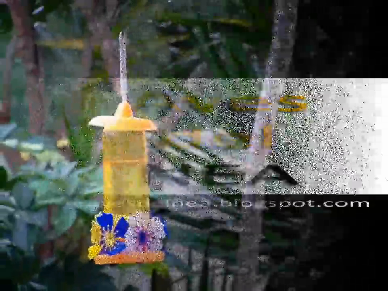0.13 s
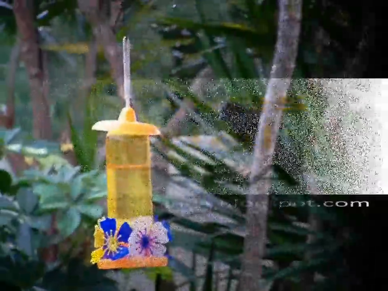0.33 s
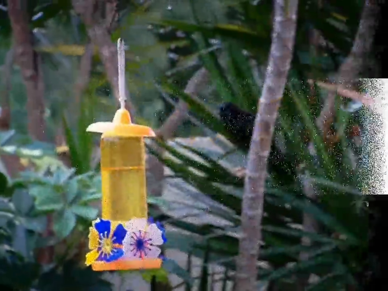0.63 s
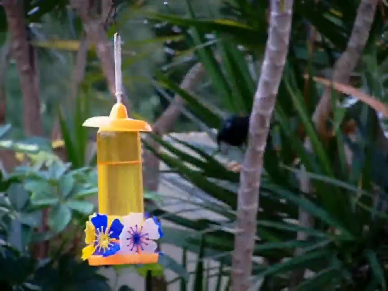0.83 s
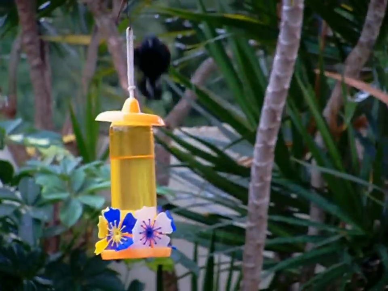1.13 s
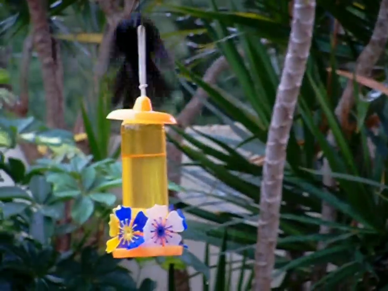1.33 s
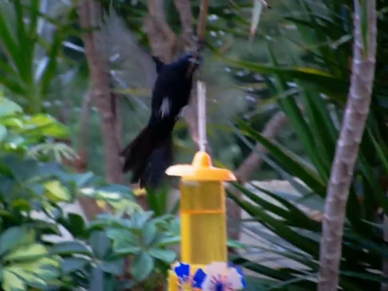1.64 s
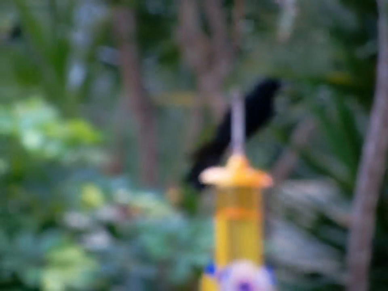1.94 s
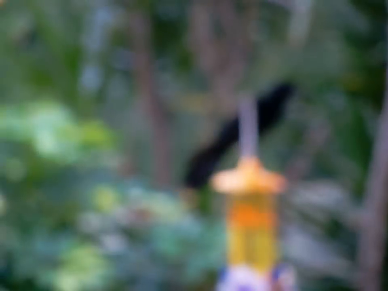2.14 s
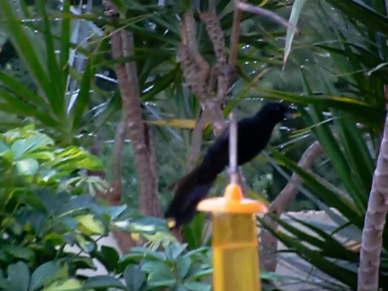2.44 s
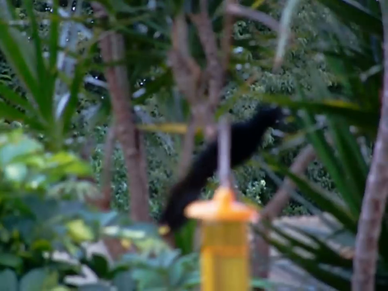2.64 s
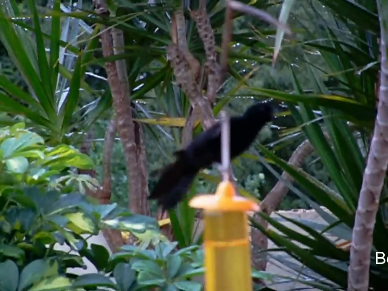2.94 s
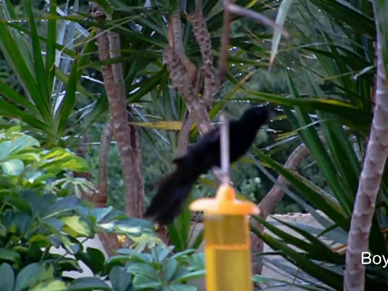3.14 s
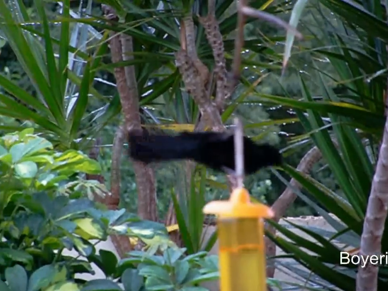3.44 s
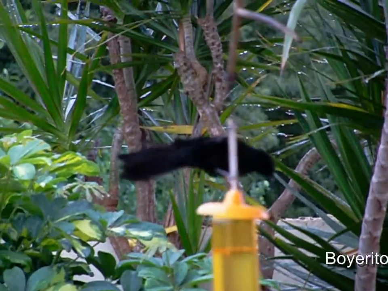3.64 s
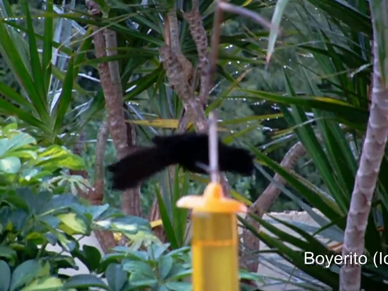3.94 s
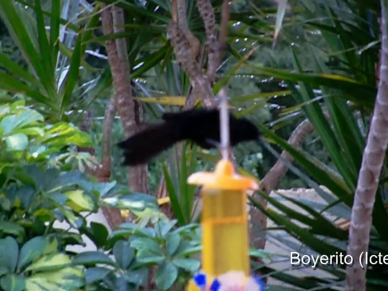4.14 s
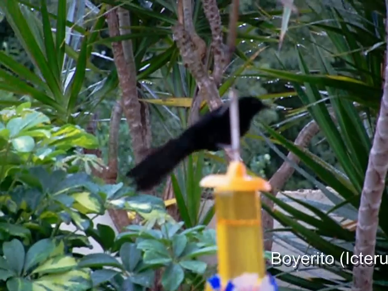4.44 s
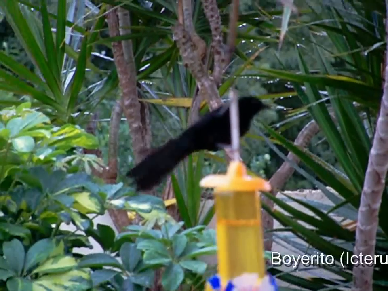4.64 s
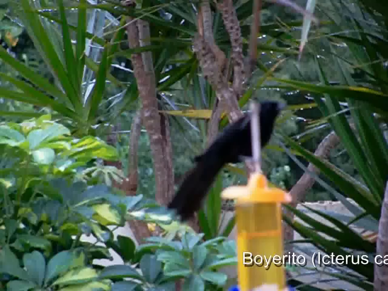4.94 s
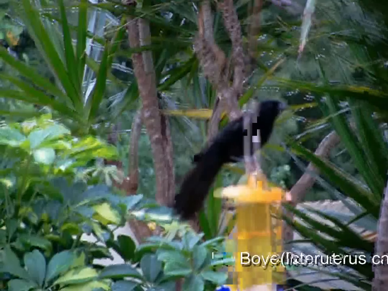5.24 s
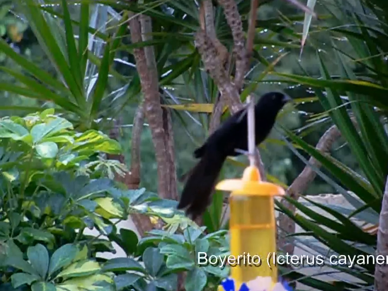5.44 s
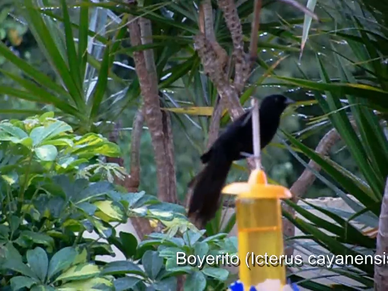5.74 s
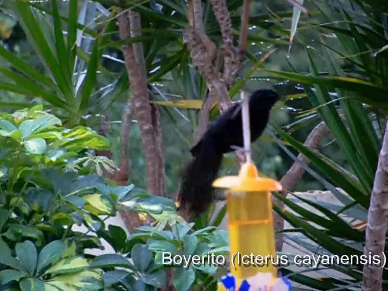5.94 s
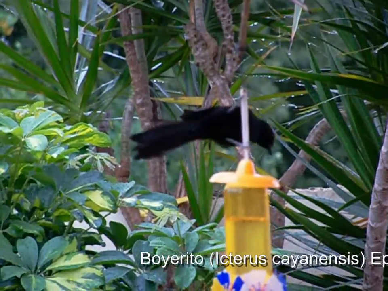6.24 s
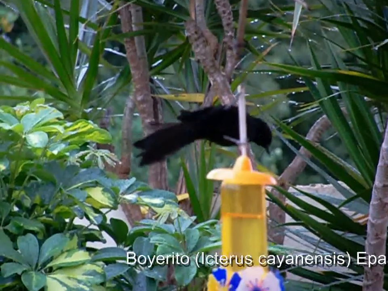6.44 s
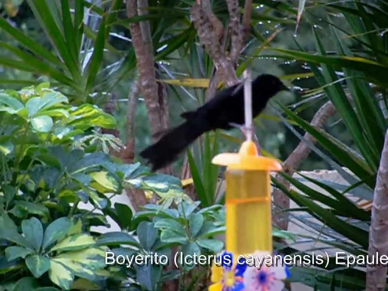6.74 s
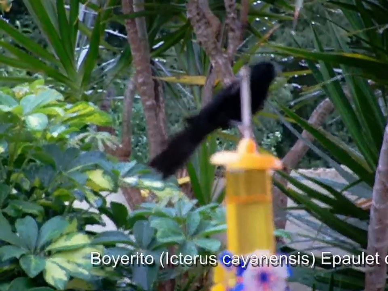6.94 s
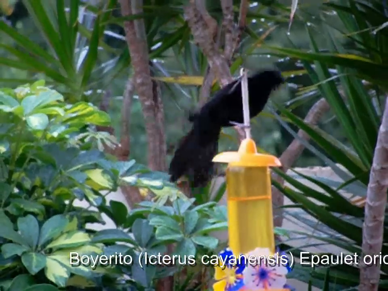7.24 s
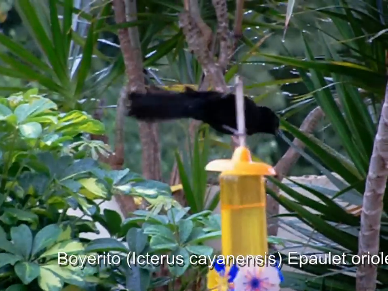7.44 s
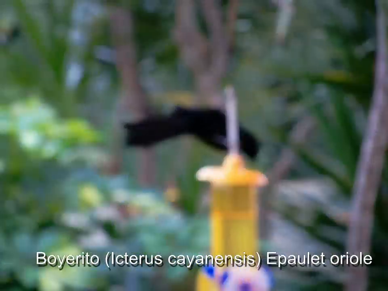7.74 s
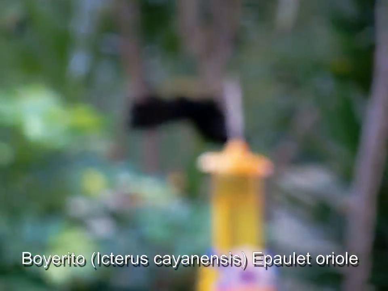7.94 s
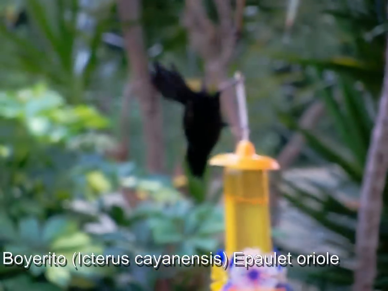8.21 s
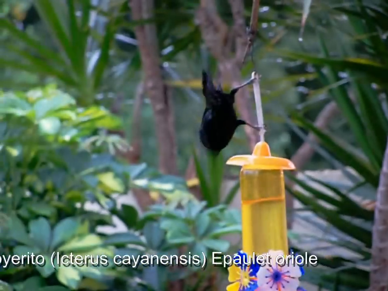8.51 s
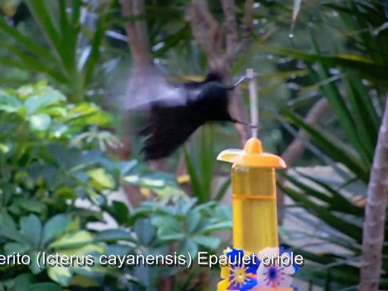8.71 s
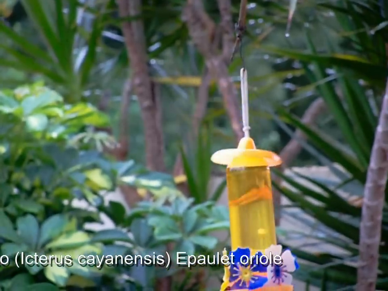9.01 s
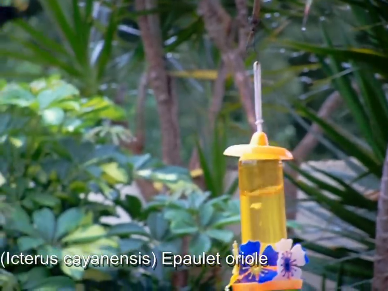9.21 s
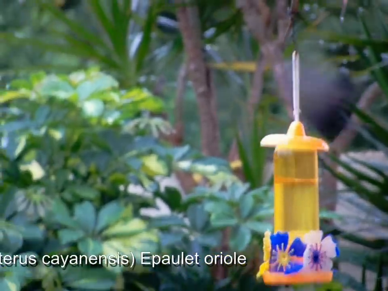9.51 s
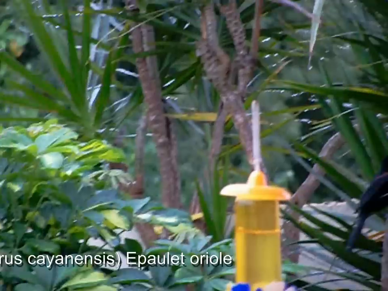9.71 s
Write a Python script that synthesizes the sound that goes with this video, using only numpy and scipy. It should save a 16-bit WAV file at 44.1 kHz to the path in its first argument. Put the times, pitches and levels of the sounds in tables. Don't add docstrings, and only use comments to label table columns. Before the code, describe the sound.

Irregular short bird calls, some clipped and piercing, some nasal or raspy, with claw scratches and tiny ticks over a low garden hum.

```python
import sys
import numpy as np
from scipy import signal
from scipy.fft import rfft, irfft
from scipy.io import wavfile
from scipy.ndimage import uniform_filter1d

SR = 44100
rng = np.random.default_rng(int(sys.argv[2]) if len(sys.argv) > 2 else 0)


def output_pcm(signal):
    pcm = np.clip(np.atleast_2d(signal).T, -1, 1) * 32767
    wavfile.write(sys.argv[1], SR, np.round(pcm).astype(np.int16))


def invert_db(x):
    u = np.asarray(x, float) / 20
    return 10 ** u


N = 435266
SAMPLING_HZ = 16000

# frequency in Hz, level in dB per Hz.
AIR_SPECTRUM = [(8.8, -55), (15, -1.5), (66, 0), (229, -10.5), (349, -13.5), (455, -15.5), (533, -16),
                (905, -18), (980, -17.5), (1660, -26.5), (1900, -28.5), (2170, -32.5), (5330, -41.5),
                (7510, -45.5), (8350, -43), (10900, -79), (18400, -120)]
# time in seconds, level in dB.
TRAFFIC_SWELL = [(0.0, -61), (0.3, -61), (0.77, -57.5), (1.67, -57.5), (4.48, -62), (5.61, -61.5),
                 (7.34, -63.5), (8.69, -64.5), (9.04, -60.5), (9.87, -62)]
# level at mean swell in dB, share of the swing it follows (0-1).
GARDEN_LAYERS = [
    (-54, 0.51),
    (-61, 0.98),
    (-63, 0.97),
]
# frequency in Hz, width in Hz, level in dB.
MOTOR_HUM = [
    (100, 10, -64),
    (963, 1.5, -75),
    (1926, 1.5, -81),
]
# frequency in Hz, time to die by 60 dB in seconds.
WALL_DECAY = [(1000, 0.22), (3000, 0.3734), (5500, 0.39), (8000, 0.34)]
# delay in seconds, spread in seconds, level over the tail in dB.
WALL_SLAPS = [
    (0.01, 0.0054, 6),
    (0.026, 0.0026, 2.5),
]
# time in seconds, peak in dB.
TICKS = [(0.4641, -33.5), (0.4904, -35), (0.5207, -36.5), (0.5703, -35.5), (0.619, -35.5), (0.678, -37),
         (0.7198, -33.5), (0.7905, -35), (0.832, -35), (1.2511, -41), (1.28, -41), (1.3111, -40.5),
         (1.697, -41), (1.726, -40.5)]
# frequency in Hz, width in Hz, level in dB.
TICK_BANDS = [(7600, 600, -7), (6300, 700, -11), (5100, 500, -15)]
# time in seconds, peak in dB.
TWITTER = [(3.113, -51), (3.170, -45), (3.222, -47), (3.268, -52), (3.284, -37), (3.322, -58)]
# time in seconds, peak in dB, frequency in Hz.
SCRATCHES = [(1.233, -40, 5460), (1.556, -38, 5140), (1.874, -31, 3510), (1.881, -29, 3510),
             (1.889, -35, 3620), (1.918, -39.5, 5580), (2.546, -41.5, 4770), (4.433, -40.5, 3430),
             (4.633, -41, 4170), (5.679, -43, 2200), (8.743, -36.5, 3440), (8.751, -39, 3280),
             (8.767, -40, 2520), (8.774, -32, 3060), (8.801, -30.5, 3890), (8.807, -22, 3530),
             (8.822, -46, 3830), (8.879, -31.5, 4730), (8.885, -25, 3190), (8.896, -30, 3560),
             (8.899, -30.5, 1800), (9.068, -42, 3240), (9.075, -34, 3360), (4.507, -45, 5400),
             (4.541, -45, 5900), (4.662, -46, 5820), (4.722, -49, 5000)]
# time in seconds, peak in dB, frequency in Hz.
TAPS = [(5.917, -46, 1900), (7.252, -56.5, 5410), (7.915, -52.5, 2110), (8.842, -48, 6350),
        (8.843, -48, 1213), (8.8, -41, 1050)]
# start in seconds, length in seconds, first pitch in Hz, last pitch in Hz, level in dB.
FAR_WHISTLES = [
    (2.6, .1, 3180, 3400, -72),
    (2.68, .12, 3420, 3230, -70),
    (3.875, .045, 2920, 2850, -68),
    (.714, .026, 4900, 4450, -47),
]
# frequency in Hz, gain in dB.
THROAT = [(900, -45), (1300, -1.5), (2000, -15), (3000, 10), (4000, -4), (5000, -4), (6000, -14),
          (7300, -6.5), (8200, -13)]
# start in seconds, length in seconds, top pitch in Hz, time of the upward snap in seconds.
ARCHES = [
    (2.845, .177, 2030, .021),
    (6.086, .177, 2085, .016),
    (6.885, .154, 2095, .018),
    (7.364, .159, 2030, .021),
]
# level in dB, swell to the end in dB, added brightness in dB per partial.
ARCH_EFFORTS = [(-36.5, 2, 0.7), (-42, 8.5, -0.14), (-37.5, 5, -0.5), (-40.5, 3, -0.2)]
# start in seconds, first voice in Hz, second voice in Hz.
CHIPS = [
    (.082, 5830, 4900),
    (2.08, 5410, 4570),
    (9.425, 5570, 4690),
]
# first voice in dB, second voice in dB, rough onset in dB.
CHIP_LEVELS = [(-31, -48, -53), (-27, -32, -44.5), (-32, -39, -52.5)]
# time in seconds, pitch in Hz, level in dB, roughness (0-1).
CHURR = [
    (3.95, 1240, -40, 0.7),
    (3.955, 1198, -44.5, 0.7),
    (3.995, 1180, -42, 1),
    (4.04, 1025, -38, 1.05),
    (4.08, 905, -47, 0.8),
    (4.099, 839, -51, 0.8),
]
# time in seconds, pitch in Hz, level in dB, roughness (0-1).
CREAK = [
    (4.925, 1245, -46.5, 0.4),
    (4.938, 1284, -43, 0.8),
    (4.955, 1053, -47, 1.3),
    (4.982, 1225, -44, 0),
    (5.005, 1193, -42, 0.1),
    (5.022, 1310, -44, 0.04),
]
# time in seconds, pitch in Hz, level in dB, roughness (0-1).
WHISTLE = [
    (5.029, 3100, -28.5, 0.09),
    (5.031, 3084, -34.5, 0),
    (5.057, 2948, -37.5, 0.04),
    (5.069, 2673, -34.5, 0.06),
    (5.086, 2415, -37, 0.1),
    (5.093, 2024, -32.5, 0.6),
    (5.099, 1740, -28.5, .6),
]
# level in dB, first partial to last.
ARCH_PARTIALS = [1.5, 3, -3.3, -4.5, -5.5, -0.5]
CLUCK_PARTIALS = [-30, 11, 0.5, 10, -7]
CHURR_PARTIALS = [-36, 6, 3, -7, -4.5, -4, -7, -12.5]
CREAK_PARTIALS = [-1.5, 4, -10.5, -19, -9.5, -12]
WHISTLE_PARTIALS = [0, -27, -13]
ONSET_PARTIALS = [2, 2.5, 10.5, 10.5, 6.5]
# level in dB, first to last.
CHURR_HALVES = [-60, -60, -14, -54.5, -5, -60, 2.5, -60.5, -10, -61, -3.5]
# frequency in Hz, gain in dB.
INPUT_FILTER = [(7500, 0.08), (7800, -5.5), (7990, -8.5)]
# frequency in Hz, gain in dB.
SMOOTHING_FILTER = [(7300, -1.07), (7800, -0.5), (8200, -6), (8600, -21), (9000, -36.5), (9400, -46),
                    (10000, -39.5), (11000, -51), (12000, -56.5), (12600, -77), (13000, -87)]


def in_log(points, hz):
    table_hz, values = np.array(points)[:, 0], np.array(points)[:, 1]
    return np.interp(np.log(hz), np.log(table_hz), values)


def rms_one(x):
    return x / np.sqrt(np.mean(np.abs(x) ** 2) + 1e-20)


def flutter(size, width_hz):
    r = np.exp(-2 * np.pi * width_hz / SR)
    white = rng.standard_normal(size) + 1j * rng.standard_normal(size)
    return rms_one(signal.lfilter([1], [1, -2 * r, r * r], white))


def add(out, s, piece):
    i = round(s * SR)
    out[i:i + len(piece)] += piece[:N - i]


def shaped(x, points):
    hz = np.arange(N // 2 + 1) * SR / N + 1
    return irfft(rfft(x) * invert_db(in_log(points, hz)), N)


def highpass(x, hz):
    return signal.sosfilt(signal.butter(4, hz, "high", fs=SR, output="sos"), x)


def garden():
    s, swell_db = np.transpose(TRAFFIC_SWELL)
    t = np.arange(N) / SR
    hz = np.arange(N // 2 + 1) * SR / N + .01
    spectrum = rfft(rng.standard_normal(N)) * invert_db(in_log(AIR_SPECTRUM, np.minimum(hz, 7400)))
    low = 1 / (1 + (hz / 200) ** 4)
    high = 1 / (1 + (2500 / hz) ** 4)
    swing_db = np.interp(t, s, swell_db - swell_db.mean())
    out = 0
    for part, (level_db, follows) in zip((low, 1 - low - high, high), GARDEN_LAYERS):
        layer = rms_one(irfft(spectrum * part, N))
        out = out + layer * invert_db(level_db + follows * swing_db)
    for line_hz, width_hz, level_db in MOTOR_HUM:
        wobble = .8 + .6 * flutter(N, width_hz)
        out = out + invert_db(level_db + 3.5) * np.imag(wobble * np.exp(2j * np.pi * line_hz * t))
    return out


def walls(x):
    echo_db, rise_s = 1.5, 0.0035
    t = np.arange(int(.7 * SR)) / SR
    white = rng.standard_normal(len(t))
    edges = np.geomspace(600, 9600, 9)
    tail = 0
    for low, high in zip(edges, edges[1:]):
        band = signal.sosfilt(signal.butter(2, [low, high], "band", fs=SR, output="sos"), white)
        tail = tail + band * invert_db(-60 * t / in_log(WALL_DECAY, np.sqrt(low * high)))
    bunches = sum(invert_db(slap_db) * np.exp(-((t - s) / spread) ** 2) for s, spread, slap_db in WALL_SLAPS)
    tail = tail * (1 - np.exp(-t / rise_s)) * (1 + bunches)
    tail = invert_db(echo_db) * tail / np.sqrt(np.sum(tail ** 2) * 5 / 2)
    return x + signal.fftconvolve(x, tail)[:N]


def puff(out, s, level_db, hz, width_hz, length):
    t = np.arange(int(4 * length * SR) + 64) / SR
    band = np.imag(flutter(len(t), width_hz) * np.exp(2j * np.pi * hz * t))
    attack = np.clip(t / 0.00055, 0, 1)
    add(out, s, invert_db(level_db) * band * np.exp(-3 * t / length) * attack)


def scratches(out):
    scratch_s = 0.01
    for s, level_db, hz in TAPS:
        puff(out, s, level_db, hz, 0.17 * hz, .006)
    for s, level_db, hz in SCRATCHES:
        puff(out, s, level_db - 9, hz, .16 * hz, scratch_s)
        puff(out, s + .001, level_db - 19.5, 1.4 * hz, 0.18 * hz, scratch_s)
        puff(out, s, level_db - 30.5, 2 * hz, 0.091 * hz, scratch_s)


def sing(out, rows, partials_db, wobble_hz=257.0):
    s, hz, level_db, rough = np.transpose(rows)
    t = s[0] + np.arange(int((s[-1] - s[0]) * SR)) / SR
    pitch = np.interp(t, s, hz)
    pitch = uniform_filter1d(pitch, len(t) // 16 + 1, mode="nearest")
    phase = 2 * np.pi * np.cumsum(pitch) / SR
    rough = np.clip(np.interp(t, s, rough), 0, 1)
    edge = np.clip(np.minimum(t - s[0], s[-1] - t) / 0.0027, 0, 1)
    tone = 0
    for k, partial_db in enumerate(partials_db, 1):
        gain = invert_db(in_log(THROAT, k * pitch) + partial_db)
        cycles = np.sqrt(1 - rough) + np.sqrt(rough) * flutter(len(t), wobble_hz)
        tone = tone + gain * np.imag(cycles * np.exp(1j * k * phase))
    add(out, s[0], np.sqrt(2) * edge * invert_db(np.interp(t, s, level_db)) * tone)


def far_whistles(out):
    fade_db, clear_db, blurred_db = 11, -40, -90
    share = np.linspace(0, 1, 20)
    for s, length, first_hz, last_hz, level_db in FAR_WHISTLES:
        rough = (clear_db - level_db) / (clear_db - blurred_db) + 0 * share
        pitch = last_hz + (first_hz - last_hz) * (1 - share) ** 2
        fade = level_db - fade_db * (2 * share - 1) ** 4
        sing(out, np.c_[s + length * share, pitch, fade, rough], [0], wobble_hz=60.)


def small_birds(out):
    for s, level_db in TICKS:
        for hz, width_hz, band_db in TICK_BANDS:
            puff(out, s, level_db + band_db + 1.5, hz, width_hz, 0.011)
    first_hz, climb_hz_per_s = 7720, 900
    for s, level_db in TWITTER:
        puff(out, s, level_db, first_hz + climb_hz_per_s * (s - TWITTER[0][0]), 150., 0.013)


def neighbours():
    out = np.zeros(N)
    small_birds(out)
    scratches(out)
    far_whistles(out)
    return out


def broken_whistle(out):
    sing(out, CREAK, CREAK_PARTIALS)
    second_voice = [(4.927, 1520, -49, .4), (4.937, 1581, -36.5, 0.82), (4.955, 1666, -43, 0.62)]
    sing(out, second_voice, [0, -6])
    sing(out, WHISTLE, WHISTLE_PARTIALS)


def churr():
    out = np.zeros(N)
    sing(out, CHURR, CHURR_PARTIALS, wobble_hz=190.)
    sing(out, np.array(CHURR) * [1, .5, 1, 1], CHURR_HALVES, wobble_hz=150.)
    sing(out, np.array(CHURR) * [1, 1.7, 0.85, 1], [-4.5], wobble_hz=200.)
    beat_hz = 185 * (1 + 0.303 * flutter(N, 57.0).real)
    beat = 2 * np.pi * np.cumsum(beat_hz) / SR
    return highpass(out, 1250) * (1 + .5 * np.cos(beat))


def chip(out, s, first_hz, second_hz, first_db, second_db, onset_db):
    start_slack, snap_s, snap_power, length_s = .58, .0108, 8, .028
    top_db, slack_loss_db, hold_s, release_db_per_s = 2, 78, 0.022, 3995
    after = np.linspace(0, length_s, 20)
    slack = start_slack / (1 + (after / snap_s) ** snap_power)
    ratio = 1 - slack
    shape_db = top_db - slack_loss_db * slack - release_db_per_s * np.maximum(after - hold_s, 0)
    rough = .15 + 0 * after
    sing(out, np.c_[s + after, first_hz * ratio, first_db + 10.5 + shape_db, rough], [0])
    sing(out, np.c_[s + .003 + after, second_hz * ratio, second_db + 8 + shape_db, rough], [0])
    creak = [(s, 1350, onset_db - 1.0, .8), (s + 0.00702, 1550, onset_db, .8), (s + 0.01365, 1900, onset_db + 8, .8)]
    sing(out, creak, ONSET_PARTIALS, wobble_hz=800.)


def cluck(out, s, level_db):
    start, length_s = s - .002, .012
    level_db = level_db - 14.5
    sing(out, [(start, 790, level_db - 6, .4), (start + length_s, 1100, level_db, .4)], CLUCK_PARTIALS)


def arch(out, s, length, top_hz, snap_s, level_db, swell_db, bright_db):
    start_slack, snap_power, sag, sag_power = .39, 3.5, .36, 7
    top_db, slack_loss_db, release_share, release_db = 1, 29.5, 0.082, 8
    steady_rough, full_rough_slack, rough_power = .03, .55, 1.6
    cluck(out, s, level_db)
    share = np.linspace(0, 1, 40)
    slack = start_slack / (1 + (share * length / snap_s) ** snap_power) + sag * share ** sag_power
    release = np.clip(1 - (1 - share) / release_share, 0, 1)
    shape_db = top_db - slack_loss_db * slack - release_db * release + swell_db * share
    rough = steady_rough + (slack / full_rough_slack) ** rough_power
    partials_db = ARCH_PARTIALS + bright_db * np.arange(len(ARCH_PARTIALS))
    sing(out, np.c_[s + length * share, top_hz * (1 - slack), level_db + shape_db, rough], partials_db)


def songbird():
    out = churr()
    broken_whistle(out)
    for call, levels in zip(CHIPS, CHIP_LEVELS):
        chip(out, *call, *levels)
    for note, effort in zip(ARCHES, ARCH_EFFORTS):
        arch(out, *note, *effort)
    return highpass(out, 950)


def scene():
    return (walls(songbird() + neighbours()) + garden())[None]


def roll_off(x):
    return signal.sosfilt(signal.butter(12, 12600, fs=SR, output="sos"), x)


def record(dry):
    kept = shaped(dry, INPUT_FILTER + [(SAMPLING_HZ / 2, -120)])
    mirrored = kept * (1 + 2 * np.cos(2 * np.pi * SAMPLING_HZ * np.arange(N) / SR))
    mix = shaped(mirrored, SMOOTHING_FILTER + [(14000, -120)])
    return roll_off(mix)


dry = scene()
out = record(dry)
output_pcm(out)
```